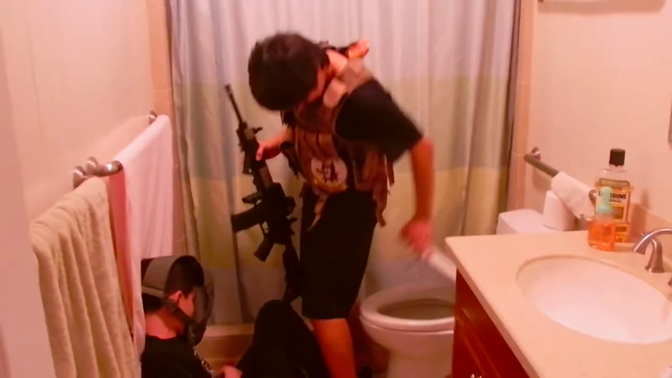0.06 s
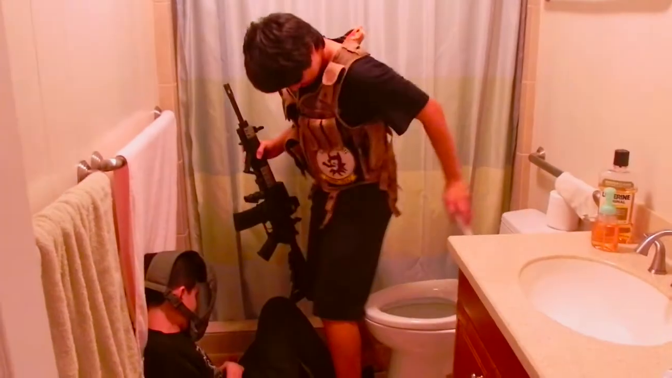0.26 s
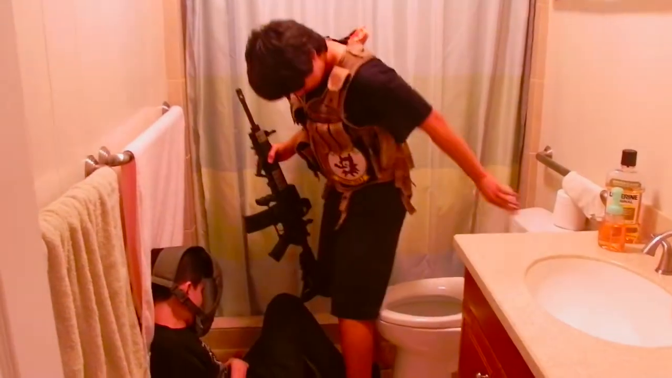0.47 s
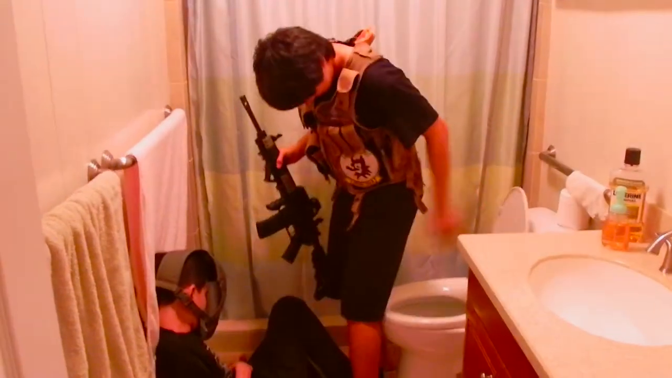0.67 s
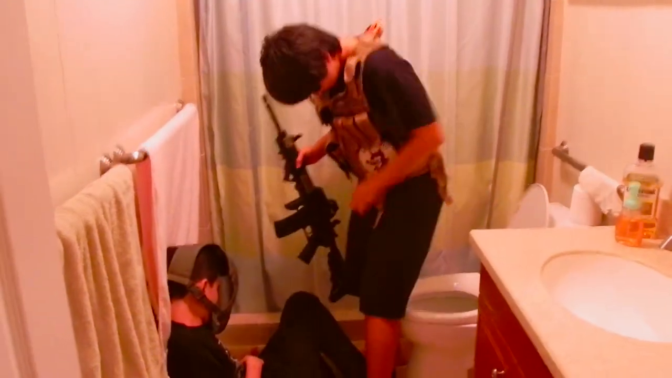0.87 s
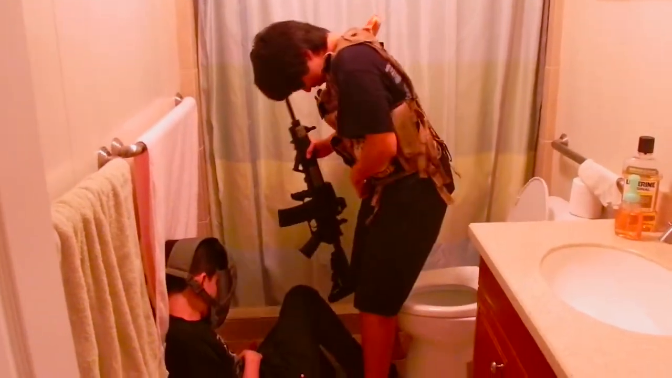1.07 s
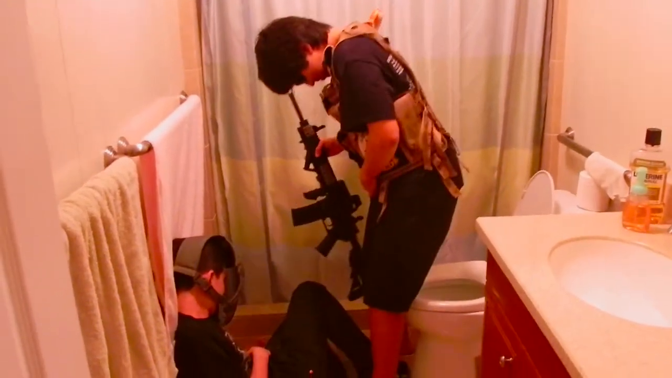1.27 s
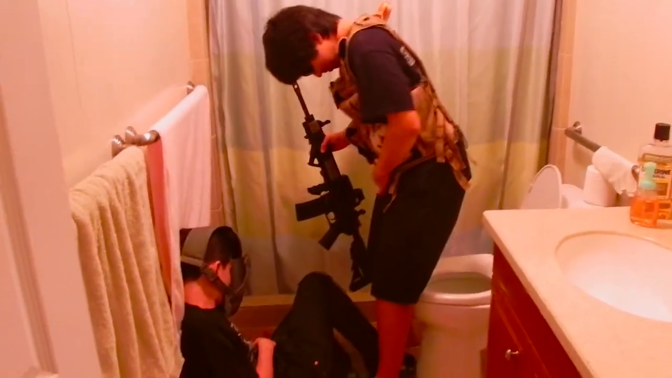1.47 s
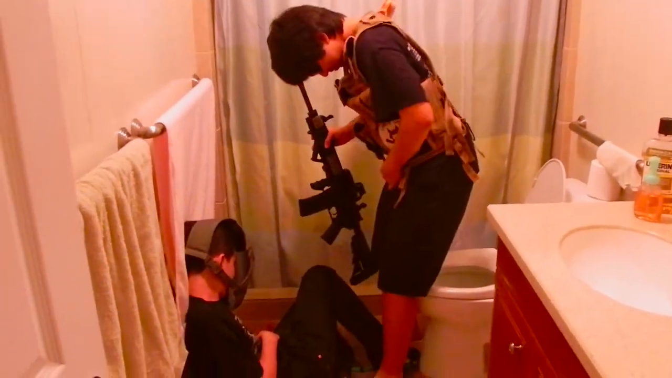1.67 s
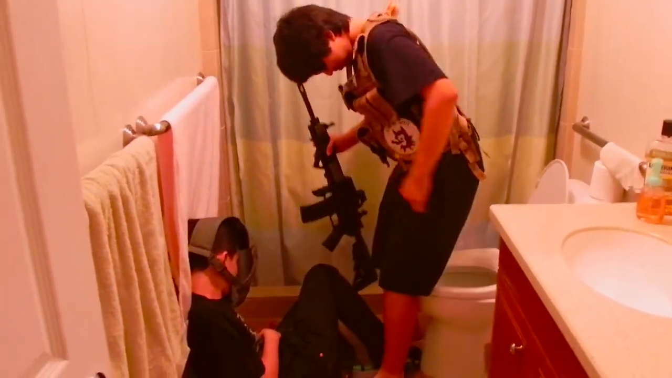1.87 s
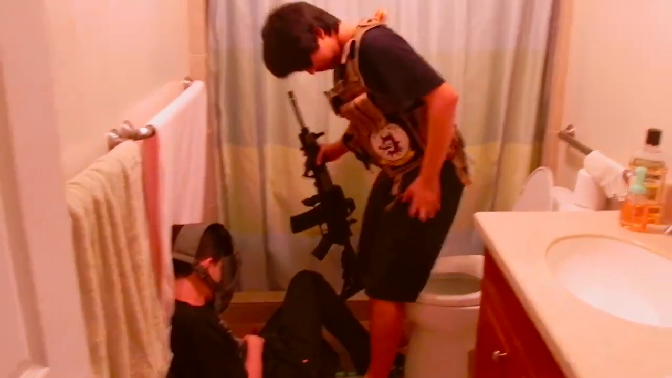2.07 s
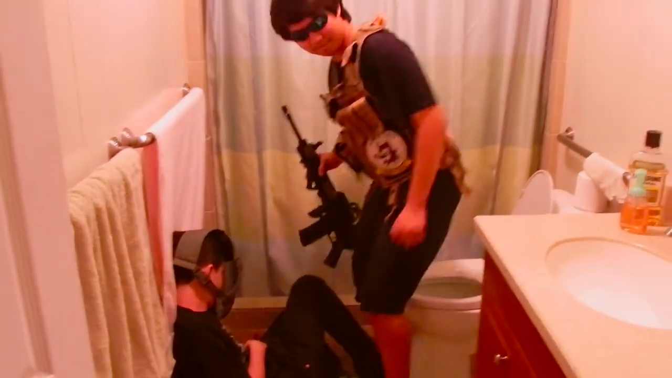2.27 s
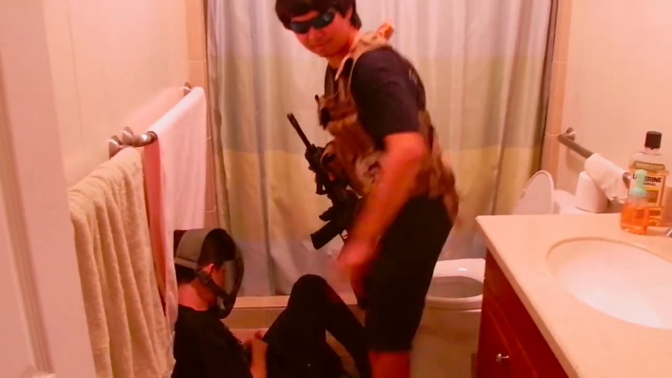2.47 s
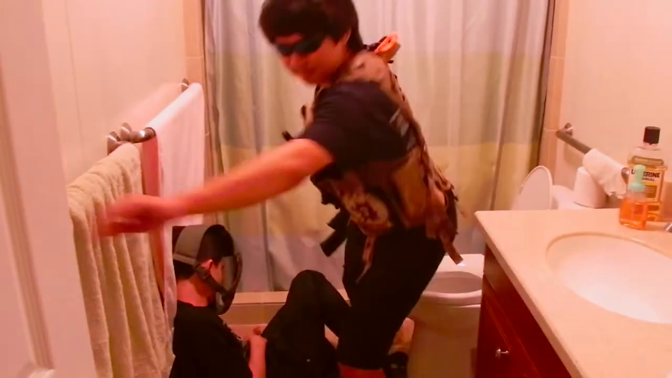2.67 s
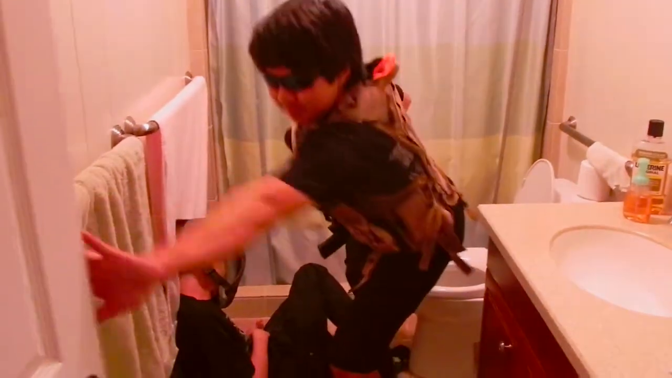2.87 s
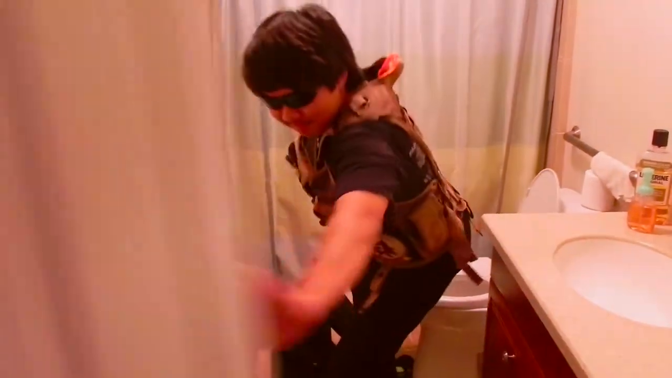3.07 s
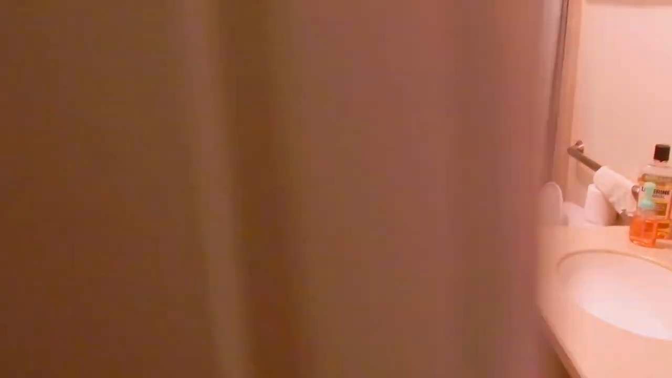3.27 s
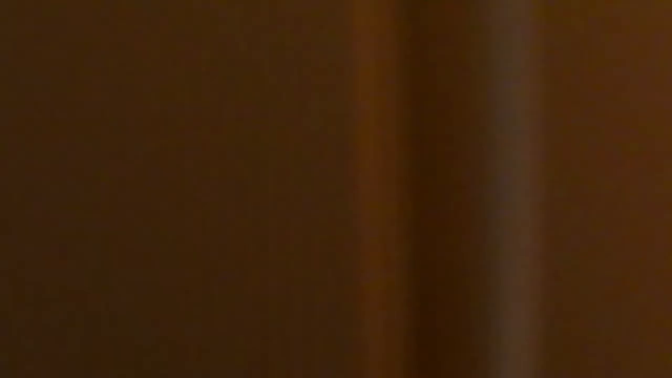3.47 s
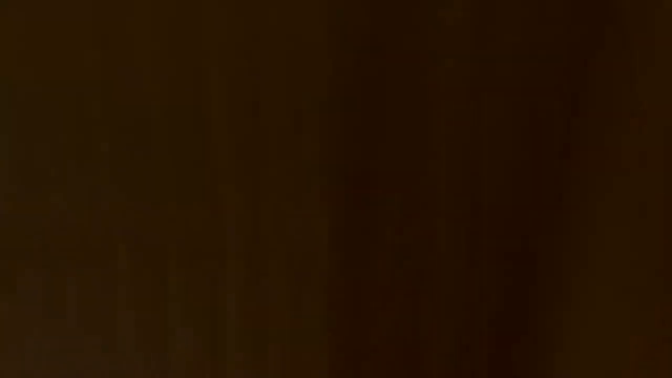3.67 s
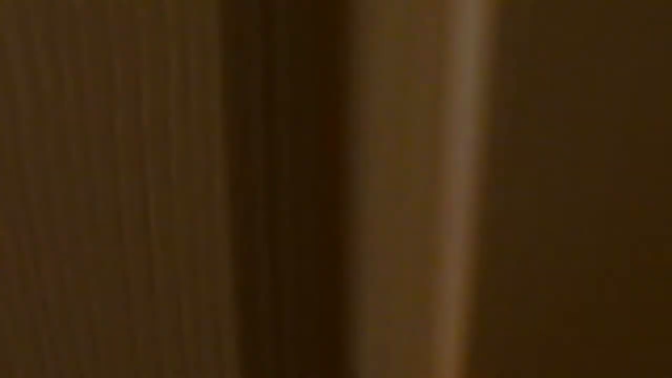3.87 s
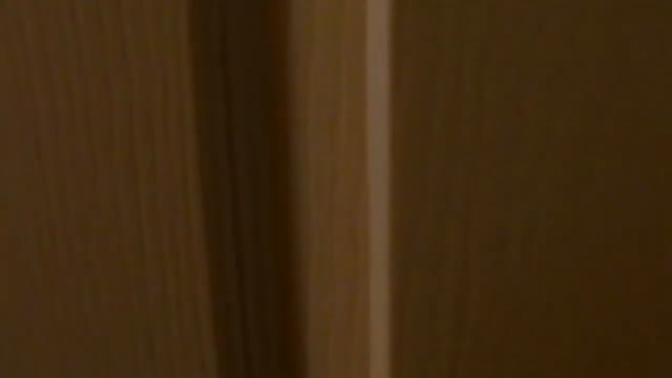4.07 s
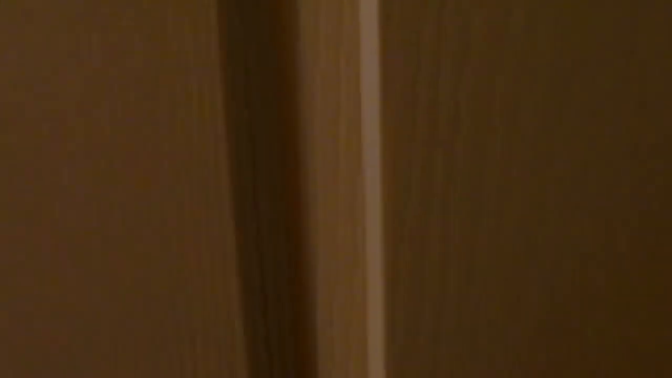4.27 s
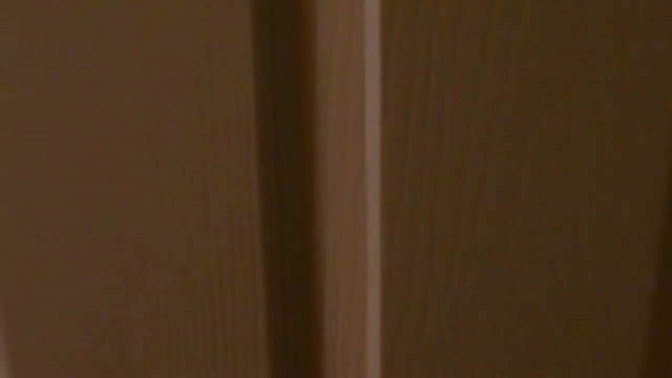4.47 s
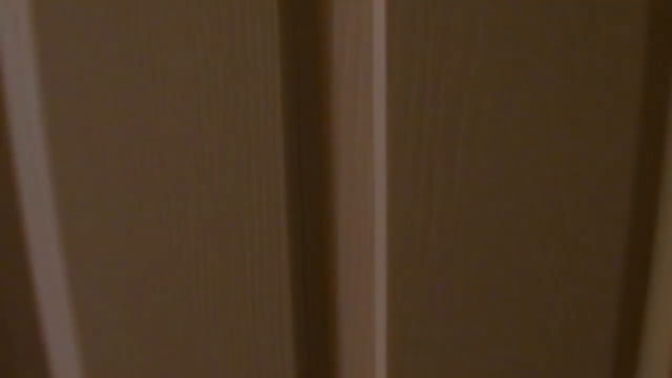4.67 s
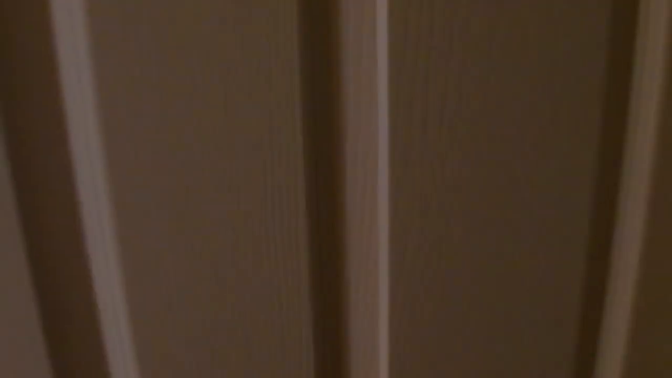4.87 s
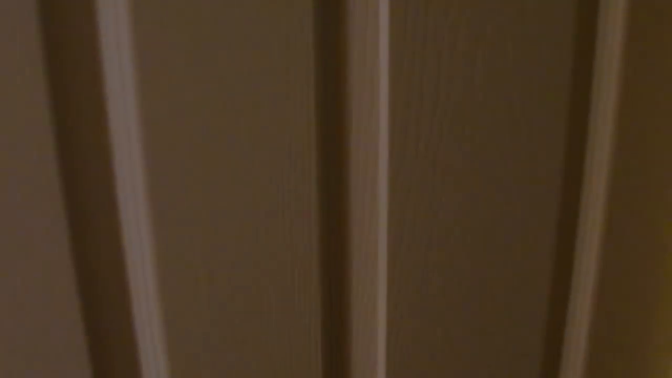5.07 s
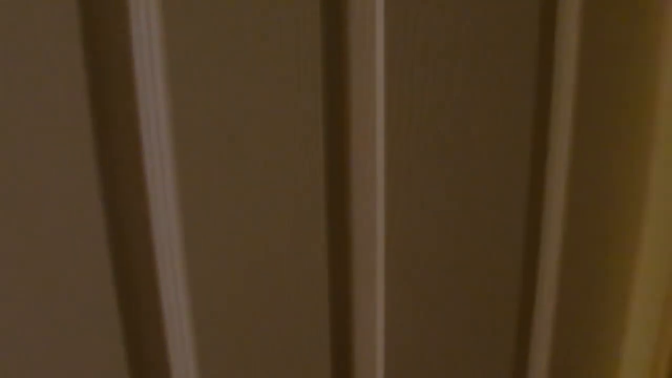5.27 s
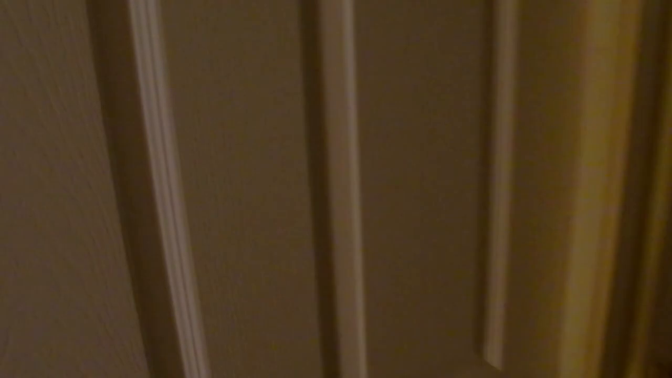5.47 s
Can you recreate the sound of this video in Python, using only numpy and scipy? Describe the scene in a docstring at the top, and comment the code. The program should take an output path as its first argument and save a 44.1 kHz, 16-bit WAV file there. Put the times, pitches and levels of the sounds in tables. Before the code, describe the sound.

Clothes and gear rustle softly in a small tiled bathroom, with light knocks over faint, low house air. At about 0.6 seconds a toilet lid clatters against the tank, several quick hits with a short ring. Softer bumps continue until about 1.8 seconds, with a brief bright strap rasp at 1.4 and fainter ones after. Around 2.8 seconds a hand slaps a wooden door: a cluster of sharp clunks, and the panel shudders with a hollow tone. Lighter knocks follow near 3.2. At about 3.7 seconds the door bangs shut, the heaviest sound, with a deep thump of air and a snapping latch. It rattles and buzzes in its frame, dying away by 4.3. From there until about 5.5 seconds, small ticks, bumps and a slight rustle sound close to the stereo microphone in the quiet hallway.

```python
"""A wooden door is slapped and swung shut in a small tiled bathroom; it rattles and shudders in its frame.
Jolts drive its panel modes and deep sway, the latch snaps and buzzes, the frame squeezes out a puff of air.
Before that, a toilet lid rings against the tank, gear rustles and a strap rasps. Small ticks and bumps
follow in the quiet hallway. Each knock is a spray of resonant clicks plus a decaying noise tail.
A stereo microphone with a peak limiter picks it all up."""
import sys
import numpy as np
from scipy import signal
from scipy.io import wavfile

SR = 44100
rng = np.random.default_rng(int(sys.argv[2]) if len(sys.argv) > 2 else 0)


def generate_wav(sig):
    """Save sig (samples, or channels by samples) to the path in sys.argv[1] as 16-bit PCM at SR."""
    pcm = np.round(np.clip(np.atleast_2d(sig).T, -1, 1) * 32767).astype(np.int16)
    wavfile.write(sys.argv[1], SR, pcm)


N = 243991
STEP_SAMPLES = 16   # envelope grid
BAND_EDGES_HZ = 25 * 2 ** (np.arange(30) / 3)
BAND_HZ = np.sqrt(BAND_EDGES_HZ[1:] * BAND_EDGES_HZ[:-1])

# spectra of house air, cloth, knocks: freq_hz, density_db
AIR_SPECTRUM = [(15, -46), (25, -10), (113, 5.5), (152, 4.5), (188, 2), (305, -13.5), (410, -15),
                (684, -1.5), (1270, -59.5), (2920, -27), (3630, -37), (3930, -50), (15500, -41)]
CLOTH_SPECTRUM = [(24, -63), (40, -29), (126, -4.5), (154, -16), (183, -5), (325, -7.5), (397, 1),
                  (427, 20), (461, -7), (1160, -8.5), (1310, -7.5), (3060, -21.5), (15500, -48.5)]
KNOCK_SPECTRUM = [(24, -52), (40, -38), (179, 8), (229, 0.5), (317, -8.5), (387, -12.5), (484, 0),
                  (562, -6.5), (621, -4.5), (1220, -9), (2010, -10), (2510, -13), (5720, -22),
                  (15500, -57.5)]
# clothes and gear: time_s, level_db, treble_db
RUSTLE_CURVE = [(0, -47.5, 3), (.55, -46, -0.5), (.7, -36, -9), (1.0, -52, 12), (1.25, -41.5, -2.5),
                (1.46, -69, 30), (1.62, -46.5, -1), (1.72, -43, 6.5), (1.9, -42.5, 3), (2.1, -37.5, 0),
                (2.2, -45, 6), (2.29, -48, 8), (2.38, -44, 6), (2.45, -49, 8.5), (2.52, -49, 10.5),
                (2.62, -42, 8), (2.73, -60.5, 20), (3.18, -38.5, -0.5), (3.36, -50.5, 1.5),
                (4.78, -50.5, 2), (4.9, -43, 2), (5.05, -50.5, 1), (5.53, -51.5, 0.5)]
# blows: start_s, level_db, thump_db, treble_db, t60_s, hardness_db
BATHROOM_KNOCKS = [(0.057, -28.5, -15, -16.5, 0.23, -2), (0.087, -27.5, -19, -28, 0.43, -1),
                   (0.225, -25.5, 0, -44, 0.33, -13), (0.364, -27.5, -23, -65, 0.29, -4),
                   (0.419, -21.5, -15.5, -52, 0.33, -1), (0.586, -17.5, -10, -23, 0.31, 8),
                   (0.601, -12.5, -18, -8, 0.25, 11.5), (0.639, -17.5, -7, -15.5, 0.41, -6),
                   (0.665, -17, -11, -18, 0.52, -8), (0.849, -25.5, -12, -55, 0.46, -6),
                   (0.935, -24.5, -11, -24, 0.5, -10), (0.958, -21.5, -14, -27.5, 0.27, -6),
                   (1.087, -27, -12, -27.5, 0.78, 3), (1.224, -25, -32, -80, 0.14, 3),
                   (1.27, -30.5, -8, -27, 0.35, -8), (1.3, -28.5, -24, -21.5, 0.49, -10),
                   (1.371, -27, -32, -17, 0.3, 11), (1.401, -25, -14.5, -21, 0.33, 12),
                   (1.498, -32.5, -18, -21, 0.55, -4), (1.701, -28, -15, -20, 0.3, 9),
                   (1.724, -32, -8, -9.5, 0.33, 4), (1.759, -27, -7, -18, 0.11, -8),
                   (2.607, -35, -10, -9, 0.79, -8), (2.688, -33, -8, -24, 0.74, -6),
                   (2.759, -12, -20, -11, 0.24, 4), (2.786, -11.5, -12, -16.5, 0.18, 8.5),
                   (2.808, -15.5, -7.5, -20, 0.67, 3), (2.875, -13.5, -2.5, -57, 0.62, -2),
                   (2.957, -24.5, -7, -14, 0.34, -6), (3.135, -33.5, -12, -33, 0.73, -1),
                   (3.199, -29, -19.5, -12.5, 0.34, -10), (3.227, -24.5, -7, -15, 0.35, -1),
                   (3.259, -31.5, 1.5, -21, 0.15, -4), (3.585, -36.5, -9, -13.5, 0.99, 3)]
LATCH_RATTLES = [(3.6655, -13, -2, -6, 0.43, 12), (3.681, -23, -20, -6, 0.065, 8),
                 (3.692, -4, -25, -30, 0.031, 4), (3.702, -11.5, -25, -25, 0.021, 14),
                 (3.721, -9.5, -17, -26, 0.12, 6), (3.747, -10, -5, -25, 0.4, 2),
                 (3.803, -13, -8, -11, 0.13, 7), (3.857, -16.5, -12, -14, 0.4, 0),
                 (3.895, -18, -9, -11, 0.1, 6), (3.903, -18, -17, -10, 0.19, 6.5),
                 (3.951, -26, -11, -14, 0.12, 3), (3.967, -20.5, -10, -13, 0.2, 6),
                 (3.977, -16, -20, -10.5, 0.066, 3), (4.06, -17, -8, -17, 0.17, 5),
                 (4.128, -23.5, -10, -22, 0.17, 2), (4.201, -24, -4, -36, 0.14, 12.5)]
HALLWAY_TICKS = [(4.399, -36, -25, -20.5, 0.21, -8), (4.6465, -32, -35, -12, 0.12, 10),
                 (4.7295, -33, -29, -45, 0.12, 7), (4.864, -27, -6, -22, 0.24, -8),
                 (4.97, -31, -24, -44, 0.25, -4), (5.238, -31, -6, -40, 0.08, 10),
                 (5.337, -40, 0, -51, 0.15, -4), (5.4335, -27, -14.5, -12, 0.13, 10)]
# tail decay of a blow: freq_hz, t60_ratio
TAIL_DECAY = [(60, 0.91), (400, 0.96), (2000, 0.76), (6000, 0.91), (14000, 0.31)]
# contact resonances: pitch_hz, width_hz, level_db, treble_share
KNOCK_MODES = [(1320, 1700, 6.5, 0.5), (4480, 1300, 8.5, 1), (9900, 5000, -3, 2)]
LATCH_MODES = [(1340, 220, 14, 0.14), (2080, 170, -4, 0.22), (4240, 300, 6.5, 0.44), (5440, 1200, 1, 0.94),
               (7940, 3000, -9, 1.2)]
TICK_MODES = [(450, 90, 32, -.15), (640, 200, 33, .5), (1110, 250, 34, .7), (1750, 350, 30, .8),
              (3700, 700, 17, .9), (5500, 2500, 4, 1)]
# lid on tank: start_s, level_db
LID_HITS = [(.587, -32), (.605, -29.5), (.632, -24.5), (.665, -28), (.70, -29.5), (.75, -32.5)]
# lid resonances: pitch_hz, level_db, t60_s
LID_MODES = [(221, -3, .25), (398, -7, .35), (475, -8, .35), (517, -3, .35), (576, -2, .33), (610, -7, .25),
             (727, -5, .25), (964, -11, .15), (1523, -11, .14), (1976, -8, .14), (2018, -9, .14),
             (4260, -20, .1)]
# strap rasps: start_s, stop_s, level_db
STRAP_RASPS = [(1.36, 1.44, -41), (1.727, 1.793, -56), (1.834, 1.934, -54.5), (2.95, 2.989, -57),
               (3.185, 3.258, -58)]
# strap resonances: pitch_hz, width_hz, level_db
STRAP_MODES = [(2200, 1200, 0), (5000, 2500, -3), (9000, 4000, -5), (13500, 3000, -17)]
# door shaking: start_s, stop_s, panel_db, sway_db, wall_db
SHUDDER_BOUTS = [(2.879, 3.014, -26, -47, -60), (3.257, 3.298, -36, -47.5, -58),
                 (3.661, 3.73, -25.5, -21.5, -47), (3.724, 4.03, -23, -23, -42),
                 (4.11, 4.256, -37, -34, -35)]
# door and wall resonances: pitch_hz, nominal_width_hz, level_db
PANEL_MODES = [
    [(179, 21, -2), (158, 24, -2.5), (215.8, 18, 1), (400, 24, 2.5), (510, 11, -17), (593, 12.5, -8),
     (715, 39, -30), (900, 14, -33)],
    [(169.5, 7, -4.5), (233, 74, -2.5), (365, 20, -8), (403.3, 18.4, -5.5), (466.9, 6.9, -7),
     (721, 54, -13)],
]   # two sets: free, caught in the frame
SWAY_MODES = [(87, 11.3, 0), (115, 23, -3), (68, 17, -2.5)]
WALL_MODES = [(45.7, 5.8, 0)]
# touches on the door: start_s, level_db, t60_s, caught_flag
DOOR_TOUCHES = [(2.879, -19, .8, 0), (2.935, -20, .8, 0), (2.985, -23, .5, 0), (3.72, -25, .5, 1),
                (3.752, -20, .3, 1), (3.803, -18, 1.6, 1), (3.888, -17.5, .65, 1), (3.972, -18.5, .8, 1),
                (4.046, -36, 2, 1), (4.13, -31, 1.5, 1), (4.203, -29, .7, 1), (4.29, -42, .3, 1)]
# clear panel tones, rows free and caught, a column per tone: pitch_hz; level_db
PANEL_TONES_HZ = [
    [178, 215, 409, 528, 576],
    [198, 294.5, 361, 412, 473],
]
PANEL_TONES_DB = [
    [0, -8, -5, -12, -12],
    [0, -12, -21, -14, -15],
]
# standing waves: pitch_hz, width_hz, level_db
BATHROOM_MODES = [(185, 24, -27), (401.6, 20, 4), (544, 3.4, -17), (572, 14, -2.5), (790, 20, -28),
                  (1330, 7.5, 0.5), (2030, 14, -17)]
# left-right likeness: freq_hz, correlation
STEREO_CORRELATION = [(60, 0.89), (200, 1), (300, 0.072), (640, 0.09), (1400, 0.34), (3100, 0.14),
                      (6800, 0.2), (15000, 0.37)]
# left over right: freq_hz, level_db
STEREO_BALANCE = [(60, -1), (180, -0.5), (550, -3), (1650, 0.5), (4970, -1), (15000, 1)]
# left ahead of right: freq_hz, phase_rad
STEREO_PHASE = [(260, 0.37), (1300, 1.85), (1900, 2.5), (3000, 0), (5000, -0.43), (9000, -0.5),
                (15800, 0.5)]


def from_db(db):
    """Decibels to gain."""
    return 10 ** (np.asarray(db) / 20)


def unit_rms(x):
    """Scale to rms 1."""
    return x / np.sqrt(np.mean(x ** 2) + 1e-20)


def at_hz(curve, hz):
    """Interpolate on a log-frequency axis."""
    freqs_hz, values = np.transpose(curve)
    return np.interp(np.log(hz), np.log(freqs_hz), values)


def band_power(spectrum):
    """Third-octave powers, sum 1."""
    power = from_db(at_hz(spectrum, BAND_HZ)) ** 2 * np.diff(BAND_EDGES_HZ)
    return power / power.sum()


def drift(rate_hz, rows):
    """Slow noise on the envelope grid, standard deviation 1."""
    r = np.exp(-2 * np.pi * rate_hz * STEP_SAMPLES / SR)
    white = rng.standard_normal((rows, N // STEP_SAMPLES + 3001))
    slow = signal.lfilter([1], [1, -2 * r, r * r], white)[:, 3000:]
    return slow / slow.std(axis=1, keepdims=True)


def resonate(x, hz, width_hz):
    """Two-pole resonator, peak gain 1."""
    r = np.exp(-np.pi * width_hz / SR)
    feedback = [1, -2 * r * np.cos(2 * np.pi * hz / SR), r * r]
    return signal.lfilter(np.array([1, 0, -1]) * (1 - r * r) / 2, feedback, x)


def right_lag_samples(hz):
    """Delay of the right channel behind the left."""
    return round(at_hz(STEREO_PHASE, hz) / (2 * np.pi * hz) * SR)


def diffuse_noise(power, t):
    """Stereo noise from band powers; envelope precedes filter, so lows bloom late."""
    out, white = 0, rng.standard_normal((2, 2, N))
    opposed = np.array([[1], [-1]])
    for k, (hz, width_hz) in enumerate(zip(BAND_HZ, np.diff(BAND_EDGES_HZ))):
        gain = np.interp(np.arange(N) / SR, t, np.sqrt(power[k] * SR / 2 / width_hz))
        bandpass = signal.butter(2, BAND_EDGES_HZ[k:k + 2], "band", fs=SR, output="sos")
        mid, side = signal.sosfilt(bandpass, gain * white[k % 2])
        correlation = at_hz(STEREO_CORRELATION, hz)
        pair = np.sqrt(1 + correlation) * mid + np.sqrt(1 - correlation) * side * opposed
        pair[1] = np.roll(pair[1], right_lag_samples(hz))
        out += pair / np.sqrt(2) * from_db(at_hz(STEREO_BALANCE, hz) / 2 * opposed)
    return out


def house_air(level_db=-52.5):
    """Band power of steady air, wavering slightly."""
    waver_db = 1.5 * drift(1.7, rows=len(BAND_HZ))
    return band_power(AIR_SPECTRUM)[:, None] * from_db(level_db + waver_db) ** 2


def cloth_rustle(t):
    """Band power of cloth: bands swell together and flicker apart."""
    times_s, *curves = np.transpose(RUSTLE_CURVE)
    level_db, treble_db = (np.interp(t, times_s, curve) for curve in curves)
    treble_share = np.clip(np.log2(BAND_HZ / 1500), 0, 2)[:, None] / 2
    flicker_db = 1.14 * drift(53, rows=1) + 1.5 * drift(5.2, rows=len(BAND_HZ))
    gain = from_db(level_db + treble_db * treble_share + flicker_db)
    return band_power(CLOTH_SPECTRUM)[:, None] * gain ** 2


def blow_noise(blows, t, rise_s, crack_db, crack_t60_s, tail_db):
    """Band power of blows: rise, short crack, tail that dies soonest in the top treble."""
    power, shape = np.zeros((len(BAND_HZ), len(t))), band_power(KNOCK_SPECTRUM)
    low, high = BAND_HZ < 300, BAND_HZ > 3500
    shape /= shape[~low & ~high].sum()
    t60_ratio = at_hz(TAIL_DECAY, BAND_HZ)[:, None]
    for start_s, level_db, thump_db, treble_db, t60_s, _ in blows:
        low_db = thump_db - 10 * np.log10(shape[low].sum())
        high_db = treble_db - 10 * np.log10(shape[high].sum())
        top_db = high_db + 20.5 + 1.7 * treble_db   # bright blows reach further up
        tilt = [(230, low_db), (340, 0.01), (1500, 0.026), (5000, high_db), (14000, top_db)]
        colour = shape * from_db(level_db + at_hz(tilt, BAND_HZ)) ** 2
        first, last = np.searchsorted(t, [start_s - 4 * rise_s, start_s + 2 * t60_s])
        age_s = t[first:last] - start_s - 0.25 * rise_s
        decay_s = np.maximum(age_s, 0)
        swell = np.exp(2 * np.minimum(age_s, 0) / rise_s)
        tail = from_db(tail_db - 60 * decay_s / (t60_s * t60_ratio)) ** 2
        crack = from_db(crack_db - 60 * decay_s / crack_t60_s) ** 2
        power[:, first:last] += colour[:, None] * swell * (tail + crack)
    return power


def contact_snaps(blows, modes, spray_decay_s, right_gain=1, lag_samples=None):
    """Each contact sends a brief click spray into a few resonances."""
    out, length = np.zeros((2, N)), 176
    sprays = rng.standard_normal((len(blows), length)) * np.exp(-np.arange(length) / (spray_decay_s * SR))
    sprays[:, 0] = 2.5   # hard first touch
    sprays *= 3 / np.linalg.norm(sprays, axis=1, keepdims=True)
    for hz, width_hz, mode_db, treble_share in modes:
        clicks = np.full(N + length, 1e-18)
        for (start_s, level_db, _, treble_db, _, hardness_db), spray in zip(blows, sprays):
            at = round(start_s * SR)
            gain = from_db(level_db + hardness_db + mode_db + treble_share * treble_db)
            clicks[at:at + length] += gain * spray
        softness = signal.butter(4, min(2 * hz, SR / 3), fs=SR, output="sos")
        ring = resonate(signal.sosfilt(softness, clicks[:N]), hz, width_hz)
        lag = right_lag_samples(hz) if lag_samples is None else lag_samples
        out += [ring, right_gain * np.roll(ring, lag)]
    return out


def toilet_lid(lag_samples=4):
    """Lid hits tank: each hit rings every mode with random polarity."""
    out = np.zeros(N)
    starts_s, hits_db = np.transpose(LID_HITS)
    at = np.round(starts_s * SR).astype(int)
    for hz, mode_db, t60_s in LID_MODES:
        clicks = np.full(N, 1e-18)
        clicks[at] = from_db(hits_db + mode_db) * rng.choice([-1, 1], len(at))
        r, step_rad = from_db(-60 / (t60_s * SR)), 2 * np.pi * hz / SR
        out += signal.lfilter([0, np.sin(step_rad)], [1, -2 * r * np.cos(step_rad), r * r], clicks)
    return np.array([out, np.roll(out, lag_samples)])


def strap_rasp(t, clicks_per_s=4000, rise_s=0.0051, fall_s=0.019):
    """Dense uneven clicks in bright resonances."""
    envelope = 0
    for start_s, stop_s, level_db in STRAP_RASPS:
        ramps = np.minimum((t - start_s) / rise_s, (stop_s - t) / fall_s + 1)
        envelope += from_db(level_db) * np.clip(ramps, 0, 1)
    fires = rng.random(N) < clicks_per_s / SR
    click_db = 4.6 * np.minimum(rng.exponential(1, N), 4)
    clicks = fires * from_db(click_db) * rng.choice([-1, 1], N)
    rasp = sum(from_db(db) * unit_rms(resonate(clicks, hz, width_hz)) for hz, width_hz, db in STRAP_MODES)
    return envelope * unit_rms(rasp)


def shudder_power(t, rise_db_per_s=1600):
    """Panel, sway, wall power. In a bout panel and sway sag, the wall builds; then all fall."""
    sag_db_per_s, fall_db_per_s = np.c_[[24.5, 25.5, -15]], np.c_[[299.5, 107, 63]]
    power = 0
    for start_s, stop_s, *levels_db in SHUDDER_BOUTS:
        onset_db = rise_db_per_s * np.maximum(start_s - t, 0)
        sag_db = sag_db_per_s * np.clip(t - start_s, 0, stop_s - start_s)
        fall_db = fall_db_per_s * np.maximum(t - stop_s, 0)
        power += from_db(np.c_[levels_db] - onset_db - sag_db - fall_db) ** 2
    return power


def door_shudder(t, shut_s=3.6):
    """Uneven jolts drive panel, whole-door sway and wall; the panel modes switch once shut."""
    def shake(modes, jolts):
        out = 0
        for hz, width_hz, level_db in modes:
            once = resonate(jolts, hz, 2 * width_hz)
            out += from_db(level_db) * unit_rms(resonate(once, hz, 2 * width_hz))
        return unit_rms(out)

    panel_jolts, sway_jolts, wall_jolts = rng.standard_normal((3, N))
    free, caught = (shake(modes, panel_jolts) for modes in PANEL_MODES)
    panel = np.where(t < shut_s, free, caught)
    parts = [panel, shake(SWAY_MODES, sway_jolts), shake(WALL_MODES, wall_jolts)]
    return (np.sqrt(shudder_power(t)) * parts).sum(axis=0)


def fittings_buzz(t, re_panel_db=-19.5):
    """Band power of latch and hinges buzzing with the panel."""
    colour = band_power(KNOCK_SPECTRUM) * (BAND_HZ > 330)
    return colour[:, None] * from_db(re_panel_db) ** 2 * shudder_power(t)[0]


def panel_ring(fade_s=0.006):
    """Clear door tones: each touch checks the old ring and starts a new one."""
    out = np.zeros(N)
    stops_s = [touch[0] for touch in DOOR_TOUCHES[1:]] + [N / SR]
    phases_turns = rng.random((len(DOOR_TOUCHES), 5))
    spreads_db = rng.normal(0, 1, phases_turns.shape)
    for k, (start_s, level_db, t60_s, caught) in enumerate(DOOR_TOUCHES):
        length_s = min(stops_s[k] - start_s, t60_s) + fade_s
        age_s = np.arange(round(length_s * SR)) / SR
        edge_s = np.minimum(age_s, age_s[-1] - age_s)
        fade = np.sin(np.pi / 2 * np.clip(edge_s / fade_s, 0, 1)) ** 2
        tone_db = np.c_[PANEL_TONES_DB[caught] + spreads_db[k]]
        turns = np.c_[PANEL_TONES_HZ[caught]] * age_s + np.c_[phases_turns[k]]
        tones = from_db(level_db + tone_db - 60 * age_s / t60_s) * np.sin(2 * np.pi * turns)
        at = round(start_s * SR)
        out[at:at + len(age_s)] += np.sqrt(2) * fade * tones.sum(axis=0)
    return out


def thin_high_ping(t, start_s=2.962, pitch_hz=14600, level_db=-56, t60_s=0.05):
    """A faint, very high tone that dies quickly."""
    envelope = from_db(level_db - 60 * np.maximum(t - start_s, 0) / t60_s) * (t > start_s)
    return envelope * np.sin(2 * np.pi * pitch_hz * t)


def air_push(t, start_s=3.6595, pitch_hz=100, level_db=-11, decay_turns=1.1):
    """Air squeezed from the frame: one pressure cycle, dying within the next."""
    turns = np.maximum(t - start_s, 0) * pitch_hz
    return from_db(level_db) * np.sin(2 * np.pi * turns) * np.exp(-(turns / decay_turns) ** 2)


def bathroom(x):
    """Standing waves lift a few pitches."""
    return x + sum(from_db(db) * resonate(x, hz, width_hz) for hz, width_hz, db in BATHROOM_MODES)


def limiter(x, threshold_db=-9, peak_fall_db_per_s=37, slope=0.7):
    """A falling peak hold cuts the gain by a share of its excess over threshold."""
    level_db = 20 * np.log10(np.abs(x).max(axis=0) + 1e-9)
    ramp_db = peak_fall_db_per_s * np.arange(N) / SR
    held_db = np.maximum.accumulate(level_db + ramp_db) - ramp_db
    excess_db = np.maximum(held_db - threshold_db, 0)
    return x * from_db(-slope * signal.lfilter([0.02], [1, -0.98], excess_db))


def scene():
    """Stereo sum: room-coloured noise plus direct sources."""
    t = np.arange(N) / SR
    grid_s = np.arange(N // STEP_SAMPLES + 1) * STEP_SAMPLES / SR
    power = blow_noise(BATHROOM_KNOCKS, grid_s, rise_s=0.005, crack_db=-14, crack_t60_s=0.0042,
                       tail_db=-6.5)
    power += blow_noise(LATCH_RATTLES, grid_s, rise_s=0.0057, crack_db=-8, crack_t60_s=0.0031,
                        tail_db=-11.5)
    power += blow_noise(HALLWAY_TICKS, grid_s, rise_s=0.015, crack_db=-14, crack_t60_s=0.011, tail_db=-7)
    power += cloth_rustle(grid_s) + house_air() + fittings_buzz(grid_s)
    snaps = contact_snaps(BATHROOM_KNOCKS, KNOCK_MODES, spray_decay_s=0.0004)
    snaps += contact_snaps(LATCH_RATTLES, LATCH_MODES, spray_decay_s=0.0007, right_gain=1.07)
    # ticks right beside the microphone: channels in opposition
    snaps += contact_snaps(HALLWAY_TICKS, TICK_MODES, spray_decay_s=0.0003, right_gain=-1, lag_samples=5)
    noise = bathroom(diffuse_noise(power, grid_s))
    strap = strap_rasp(t)
    door = (door_shudder(t) + panel_ring()) * from_db([[-0.7], [0.7]])
    return noise + snaps + toilet_lid() + strap + door + thin_high_ping(t) + air_push(t)


def record(dry, low_cut_hz=43, high_cut_hz=16030):
    """Microphone: bass cut, limiter, steep top cut."""
    highpass = signal.butter(2, low_cut_hz, "high", fs=SR, output="sos")
    lowpass = signal.cheby2(20, 60, high_cut_hz, fs=SR, output="sos")
    return signal.sosfilt(lowpass, limiter(signal.sosfilt(highpass, dry)))


dry = scene()
out = record(dry)
generate_wav(out)
```